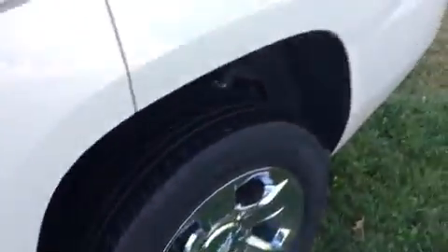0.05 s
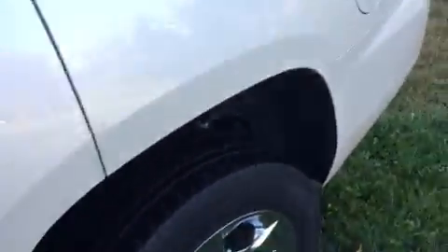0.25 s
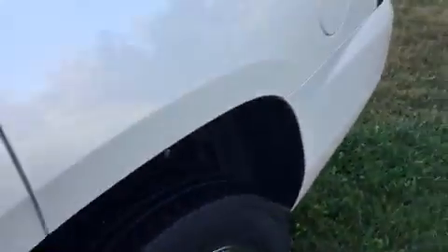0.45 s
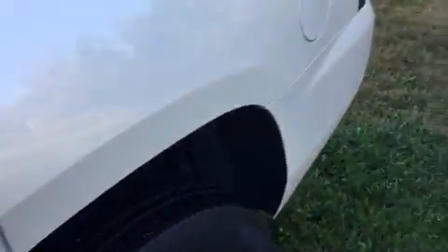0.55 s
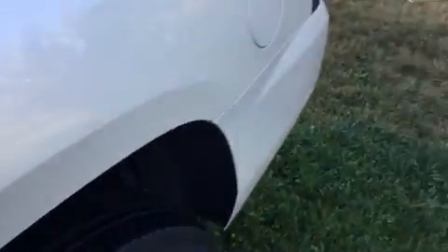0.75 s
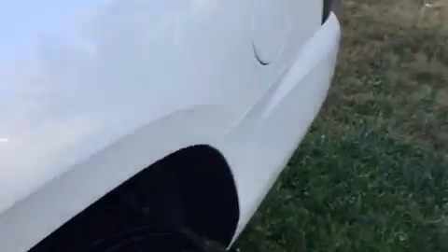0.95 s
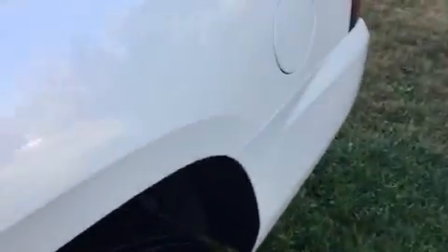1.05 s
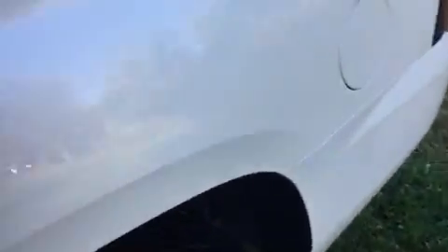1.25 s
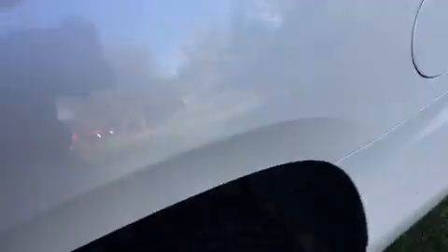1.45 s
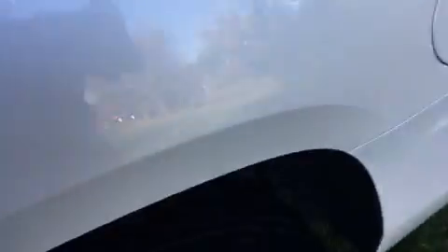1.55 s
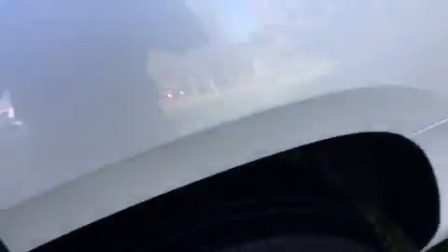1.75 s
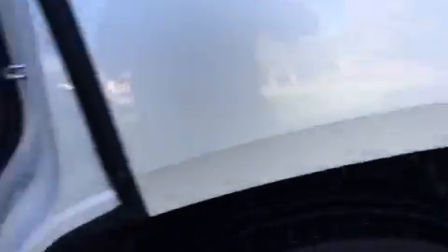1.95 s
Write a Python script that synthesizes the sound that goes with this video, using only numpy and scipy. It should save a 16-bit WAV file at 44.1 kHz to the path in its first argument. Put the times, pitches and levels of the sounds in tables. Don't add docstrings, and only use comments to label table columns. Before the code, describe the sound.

A heavy car door slams shut close by, then a second door unlatches with soft knocks outdoors.

```python
import sys
import numpy as np
from scipy import signal
from scipy.io import wavfile

SR = 44100
rng = np.random.default_rng(int(sys.argv[2]) if len(sys.argv) > 2 else 0)


def gain_from_db(level_db):
    decades = np.asarray(level_db, float) / 20
    return 10 ** decades


def generate_wav(signal):
    frames = np.transpose(np.atleast_2d(signal))
    scaled = np.clip(frames, -1, 1) * 32767
    pcm = np.round(scaled).astype(np.int16)
    wavfile.write(sys.argv[1], SR, pcm)


N = 88200


def rms_one(x):
    return x / np.sqrt(np.mean(x ** 2) + 1e-20)


def in_time(rows):
    return np.interp(np.arange(N) / SR, *np.transpose(rows))


def drift(rate_hz):
    r = np.exp(-2 * np.pi * rate_hz * 40 / SR)
    white = rng.standard_normal(N // 40 + 2002)
    slow = signal.lfilter([1], [1, -2 * r, r * r], white)[2000:]
    return np.interp(np.arange(N) / 40, np.arange(len(slow)), rms_one(slow))


def ring(clicks, hz, t60_s):
    r = gain_from_db(-60 / (t60_s * SR))
    w = 2 * np.pi * hz / SR
    return signal.lfilter([0, np.sin(w)], [1, -2 * r * np.cos(w), r * r], clicks + 1e-18)


def coloured(white, colour, patchy_db, rate_hz):
    hz, db = np.transpose(colour)
    octaves = np.log2(min(hz[-1], 11000) / hz[0])
    edges_hz = hz[0] * 2 ** np.arange(0, octaves + .4, .5)
    out, together = 0, drift(3.5)
    for k, (low, high) in enumerate(zip(edges_hz, edges_hz[1:])):
        sos = signal.butter(2, [low, min(high, .45 * SR)], "band", fs=SR, output="sos")
        level_db = np.interp(np.log(low * high) / 2, np.log(hz), db)
        flicker_db = patchy_db * (.5 * together + drift(rate_hz))
        out = out + signal.sosfilt(sos, white[k % 2]) * gain_from_db(level_db + flicker_db)
    return out


def noise_band(white, hz, width_hz):
    low = max(hz - width_hz / 2, 60)
    sos = signal.butter(2, [low, low + width_hz], "band", fs=SR, output="sos")
    return rms_one(signal.sosfilt(sos, white))


def bursts(rows, rise_s):
    out, t = np.zeros(N + SR), np.arange(SR // 3) / SR
    for start_s, level_db, hz, width_hz, t60_s in rows:
        i = int(start_s * SR)
        envelope = gain_from_db(level_db - 60 * t / t60_s) * (1 - np.exp(-t / rise_s))
        out[i:i + len(t)] += noise_band(rng.standard_normal(len(t)), hz, width_hz) * envelope
    return out[:N]


# time_s, level_db
TRAFFIC_SWELL = [
    (0.0, -50),
    (0.54, -50),
    (0.72, -48.5),
    (1.2, -46),
    (1.38, -47),
    (2.0, -48.5),
]
# freq_hz, density_db_per_hz
TYRE_COLOUR = [(110, -57), (180, 2.5), (213, 0.5), (500, 0.5), (602, -0.5), (1230, 1), (2200, -7),
               (3590, -17), (9480, -26.5), (10500, -46), (13600, -80), (22000, -120)]
# freq_hz, density_db_per_hz
ENGINE_COLOUR = [(13, -39), (22, -19), (65, 1), (103, -8), (134, -4), (183, -18), (300, -15.5), (390, -96),
                 (660, -120)]


def far_traffic():
    hiss = rms_one(coloured(rng.standard_normal((2, N)), TYRE_COLOUR, patchy_db=-1.26, rate_hz=17.4))
    rumble = rms_one(coloured(rng.standard_normal((2, N)), ENGINE_COLOUR, patchy_db=2.5, rate_hz=2.4))
    hiss_trim_db, rumble_db = 1, -43
    return gain_from_db(in_time(TRAFFIC_SWELL) + hiss_trim_db) * hiss + gain_from_db(rumble_db) * rumble


def insect():
    return gain_from_db(-69) * noise_band(rng.standard_normal(N), hz=5660, width_hz=610)


# middle_s, level_db, centre_hz, width_hz, length_s
BRUSHES = [
    (0.1, -56.5, 7700, 6800, 0.19),
    (0.591, -65, 8000, 8200, 0.37),
    (0.753, -64.5, 4050, 4700, 0.64),
    (1.066, -48, 3800, 7200, 0.082),
    (0.99, -59.5, 1900, 2100, 0.29),
    (1.116, -51, 2000, 1800, 0.13),
    (0.267, -50, 5140, 3600, 0.065),
    (1.23, -50.5, 2300, 2370, 0.3),
    (1.71, -62.5, 8400, 5300, 0.35),
]


def brushing():
    out, t = np.zeros(N), np.arange(N) / SR
    for middle_s, level_db, hz, width_hz, length_s in BRUSHES:
        swell = gain_from_db(level_db) * np.exp(-(2 * (t - middle_s) / length_s) ** 2)
        out += noise_band(rng.standard_normal(N), hz, width_hz) * swell
    return out


# start_s, level_db, centre_hz, width_hz, t60_s
THUD_EVENTS = [(.187, -22, 490, 719, 0.1), (.204, -22, 450, 690, 0.26), (.24, -21, 170, 149, 0.33),
               (.285, -26, 241, 232, 0.039), (.99, -37.5, 252, 250, 0.24), (1.032, -35.5, 300, 250, 0.1),
               (1.07, -32, 280, 150, 0.068), (1.0865, -35.5, 500, 860, 0.23), (1.17, -34.5, 490, 594, 0.13),
               (1.6, -36.5, 220, 257, 0.16), (1.765, -39.5, 276, 245, 0.088)]


def padding_thuds():
    return bursts(THUD_EVENTS, rise_s=0.0011)


# start_s, level_db, centre_hz, width_hz, t60_s
TICK_EVENTS = [(.185, -70, 4000, 6900, 0.065), (.193, -36, 2480, 2140, 0.072),
               (.2005, -23.5, 5310, 10200, 0.031), (.2022, -11.5, 5850, 9400, 0.018),
               (.2037, -11.5, 980, 1200, 0.023), (.209, -25.5, 3500, 4950, 0.059),
               (.219, -32, 4000, 6900, 0.015), (.2305, -29.5, 3780, 3980, 0.05),
               (.591, -48.5, 2940, 4000, .03), (.239, -22.5, 2450, 1200, 0.02),
               (.961, -52, 5840, 6200, .02), (1.033, -33, 1480, 1220, 0.018),
               (1.0355, -47, 3800, 5000, .05), (1.04, -38.5, 1400, 2030, 0.045),
               (1.098, -37, 2200, 990, 0.074), (1.1075, -34, 6900, 5030, 0.018),
               (.245, -35.5, 2360, 1210, 0.038), (1.5615, -49, 5000, 8000, .025),
               (1.5615, -40, 2800, 1500, .04), (1.572, -48, 3050, 2430, 0.027),
               (1.5838, -32.5, 4440, 3940, 0.02), (1.586, -29, 1160, 1960, 0.053),
               (1.589, -46, 5550, 1800, 0.069)]


def latch_ticks():
    return bursts(TICK_EVENTS, rise_s=.0003)


# start_s, level_db, pitch_hz,
# t60_s
KNOCK_EVENTS = [(.1945, -13, 257, .03), (.2034, -10, 345, 0.023), (.2034, -12, 950, 0.028),
                (.2152, -11, 139, 0.12), (0.207, -21.5, 1720, 0.045), (0.214, -14.5, 592, 0.039),
                (.24, -28.5, 680, 0.032), (.254, -27, 1900, 0.024), (0.23, -22.5, 1018, 0.034),
                (.274, -27.5, 608, 0.057), (.289, -18, 297, 0.11), (.44, -31, 62.6, 0.37),
                (0.557, -27.5, 59.5, 0.39), (1, -29.5, 167, 0.1), (1.0052, -26, 1970, 0.011),
                (1.0052, -29, 1710, 0.013), (1.033, -40, 1360, 0.02), (1.0385, -37.5, 2900, .025),
                (1.037, -38, 3470, 0.016), (1.0862, -29, 300, 0.026), (1.0903, -10.5, 203, 0.039),
                (1.0904, -11, 145.6, 0.096), (1.088, -29, 880, 0.018), (1.099, -26, 534, 0.044),
                (1.103, -34, 976, .05), (1.098, -16.5, 60, 0.12), (1.103, -16.5, 344, 0.033),
                (1.107, -25, 2220, .022), (1.1075, -32, 2650, .02), (1.135, -23.5, 114.7, 0.143),
                (1.1705, -24, 570, 0.021), (1.175, -20, 90, 0.06), (1.176, -30, 316, 0.045),
                (1.19, -34.5, 190, 0.087), (.6, -34.5, 148, .15), (1.329, -35, 70.8, 0.65),
                (1.5848, -25, 3450, .02), (1.5842, -31, 2500, .025), (1.5845, -31, 4300, .025),
                (1.5855, -36, 6100, .03), (1.586, -32, 5250, .035), (1.5905, -33, 5700, .02),
                (1.515, -30.5, 108, 0.11), (1.55, -32, 128, 0.1), (1.5965, -33, 486, 0.031),
                (1.67, -32.5, 75.7, 0.35), (1.773, -25.5, 68.6, 0.1), (1.836, -24.5, 60.7, 0.23)]


def ringing_hits():
    out, rise_cycles = np.zeros(N), .4
    for start_s, level_db, hz, t60_s in KNOCK_EVENTS:
        t = np.maximum(np.arange(N) / SR - start_s, 0)
        rise = 1 - np.exp(-t * hz / rise_cycles)
        out -= gain_from_db(level_db - 60 * t / t60_s) * rise * np.sin(2 * np.pi * hz * t)
    return out


# time_s, level_db
RATTLE_FORCE = [
    (.18, -58),
    (.192, -29.5),
    (.203, -13.5),
    (.218, -22.5),
    (.243, -25),
    (.263, -33.5),
    (.295, -36),
    (.311, -45.5),
    (.33, -64),
]
# freq_hz, density_db_per_hz
TRIM_COLOUR = [(180, -22), (300, -10), (789, -42), (1030, -35), (1740, -21), (2630, -22), (3240, -30),
               (8920, -50.5), (10500, -37), (13600, -82), (22000, -120)]


def trim_rattle():
    clicks_per_s, size_db, hiss_share, trim_db = 980, 7.5, 0.67, -2.5
    sizes = gain_from_db(size_db * np.minimum(rng.exponential(1, N), 3)) * rng.choice([-1, 1], N)
    clicks = rms_one(sizes * (rng.random(N) < clicks_per_s / SR))
    force = clicks + hiss_share * rng.standard_normal((2, N))
    noise = rms_one(coloured(force, TRIM_COLOUR, patchy_db=0.0, rate_hz=20.0))
    t = np.arange(N) / SR
    on = (t > RATTLE_FORCE[0][0]) & (t < RATTLE_FORCE[-1][0])
    return on * gain_from_db(in_time(RATTLE_FORCE) + trim_db) * noise


def panel_flex():
    start_s, level_db, edge_s, lean = .2036, -4, .0002, .45
    top_hz, end_hz, sag_s = 148, 52.7, .013
    hold_s, flex_t60_s, boom_t60_s, boom_share = .014, .045, 0.44, 0.48
    t = np.maximum(np.arange(N) / SR - start_s, 0)
    taut = np.exp(-(t / sag_s) ** 6)
    pitch_hz = (end_hz + (top_hz - end_hz) * taut) * (t > 0)
    turn = 2 * np.pi * np.cumsum(pitch_hz) / SR
    late = np.maximum(t - hold_s, 0)
    flex_fade = (1 - boom_share) * gain_from_db(-60 * late / flex_t60_s)
    boom_fade = boom_share * gain_from_db(-60 * late / boom_t60_s)
    swing = np.cos(turn - lean * taut * (1 - np.cos(turn)))
    return -gain_from_db(level_db) * (flex_fade + boom_fade) * (1 - np.exp(-t / edge_s)) * swing


# freq_hz, level_db, t60_s
DOOR_MODES = [(88.8, -11.5, 0.3), (148.5, -8.5, 0.086), (201, -14, 0.1), (233, -8, 0.089),
              (275.8, -9.5, 0.21), (357.4, -16, 0.19), (394, -9.5, 0.08), (399, -11, 0.089),
              (581, -14, 0.045), (620, -34, 0.06), (754, -26, 0.14), (833, -13, 0.037), (980, -8, 0.032),
              (1085, -18.5, 0.15)]
# start_s, level_db, contact_cut_hz
DOOR_BLOWS = [
    (0.194, -15, 500),
    (0.2036, -7, 1490),
    (0.222, -16, 696),
    (0.233, -11, 705),
    (.262, -22, 325),
    (.289, -13, 257),
]


def door_body():
    spread_db, lag_cycles = 6.5, 0.708
    out = np.zeros(N)
    for hz, mode_db, t60_s in DOOR_MODES:
        clicks = np.zeros(N)
        for start_s, blow_db, cut_hz in DOOR_BLOWS:
            softness = 1 / (1 + (hz / cut_hz) ** 2)
            strength = gain_from_db(blow_db + mode_db + spread_db * rng.standard_normal())
            i = int((start_s + lag_cycles / hz) * SR)
            clicks[i] += softness * rng.choice([-1, 1]) * strength
        out += ring(clicks, hz, t60_s)
    return out


def scene():
    background = far_traffic() + insect() + brushing()
    contacts = padding_thuds() + latch_ticks() + ringing_hits()
    door = trim_rattle() + panel_flex() + door_body()
    return (background + contacts + door)[None]


def roll_off(x):
    return signal.sosfilt(signal.butter(12, 11110, fs=SR, output="sos"), x)


def record(dry):
    rounded = dry / (1 + dry ** 6) ** (1 / 6)
    low_pass = signal.cheby2(12, 60, 11030 * 1.04, fs=SR, output="sos")
    return roll_off(signal.sosfilt(low_pass, rounded))


dry = scene()
out = record(dry)
generate_wav(out)
```